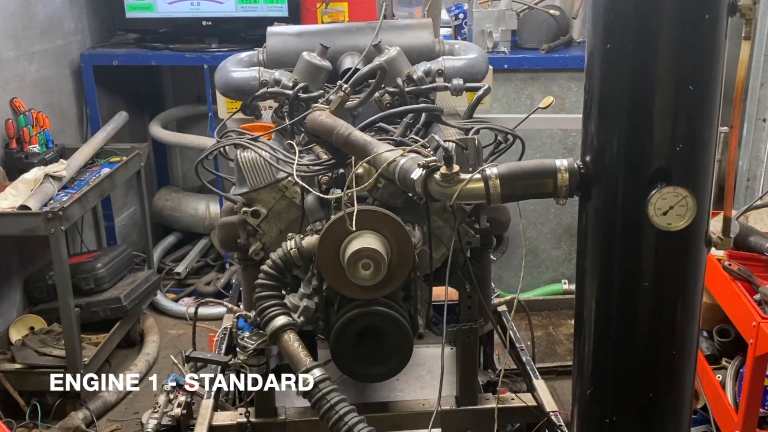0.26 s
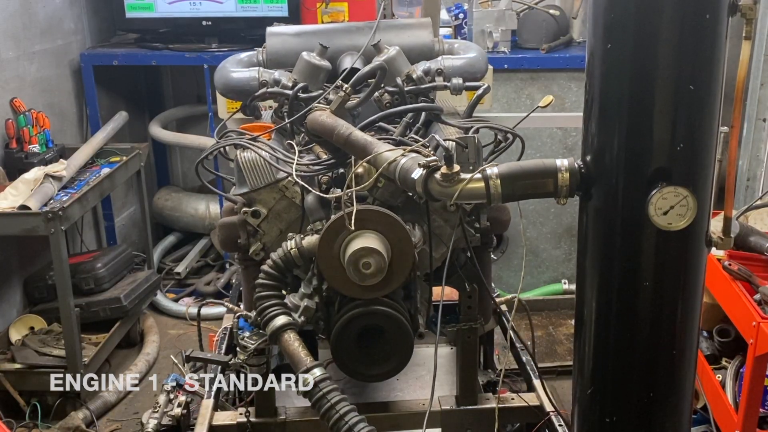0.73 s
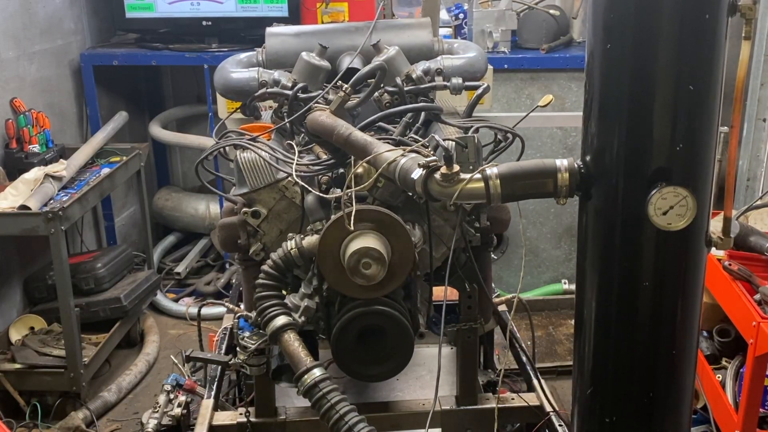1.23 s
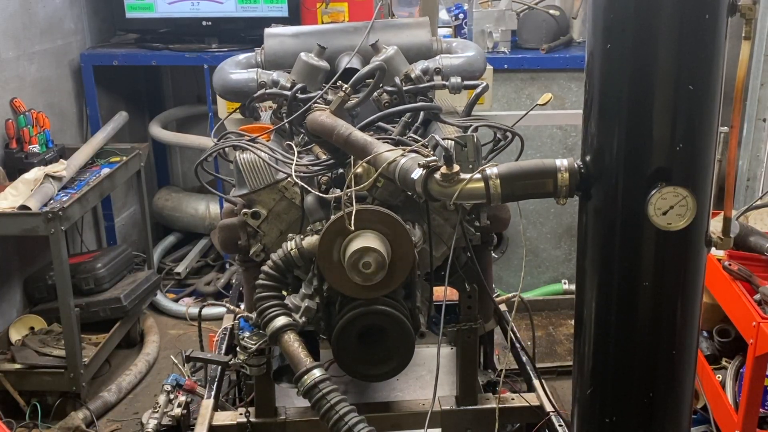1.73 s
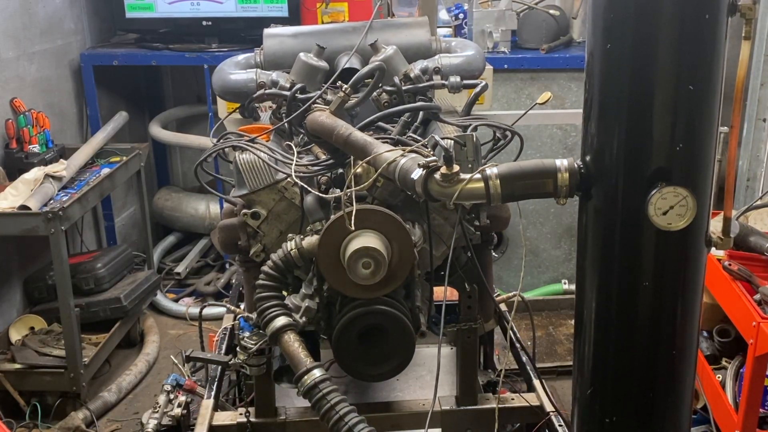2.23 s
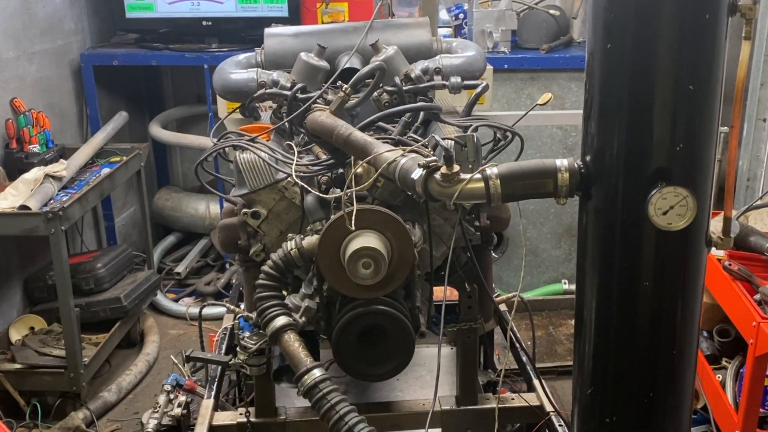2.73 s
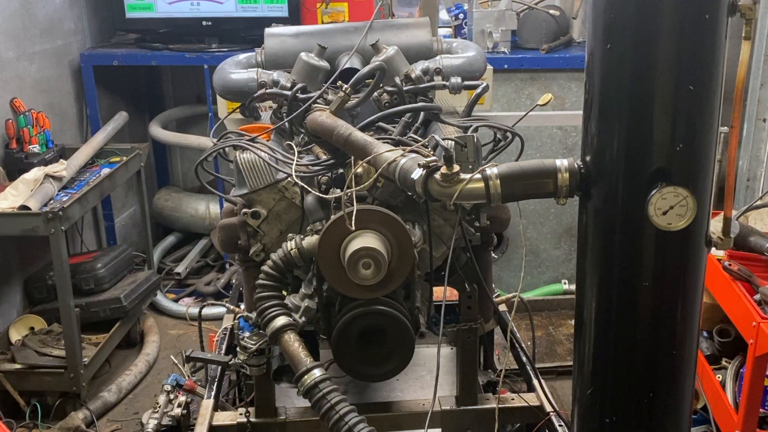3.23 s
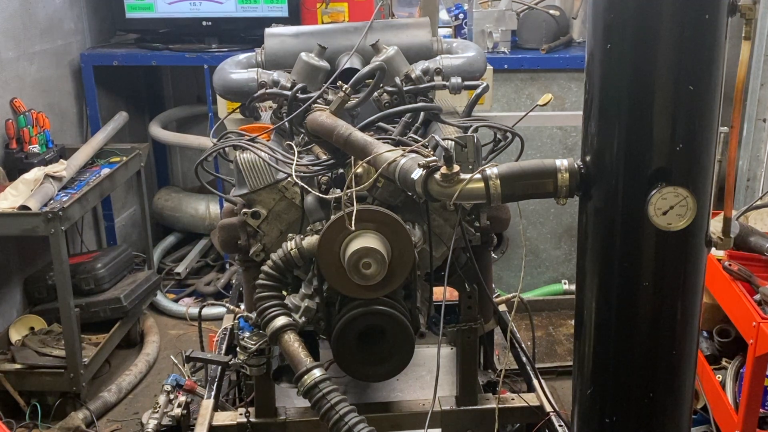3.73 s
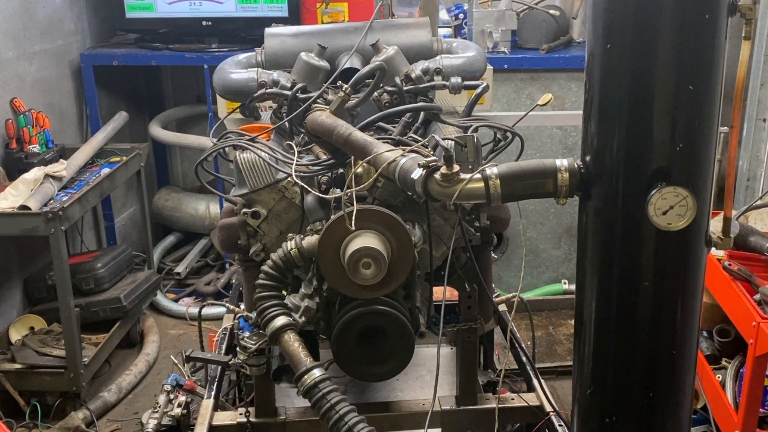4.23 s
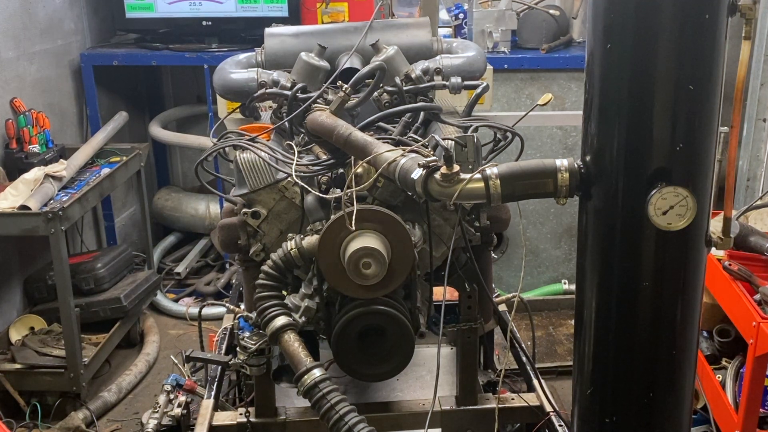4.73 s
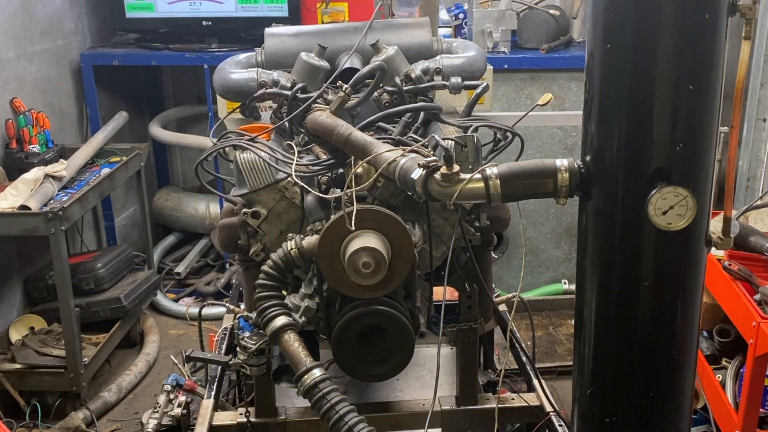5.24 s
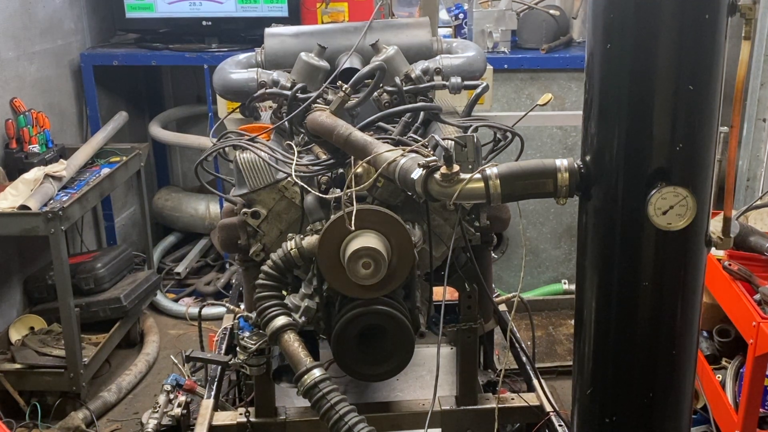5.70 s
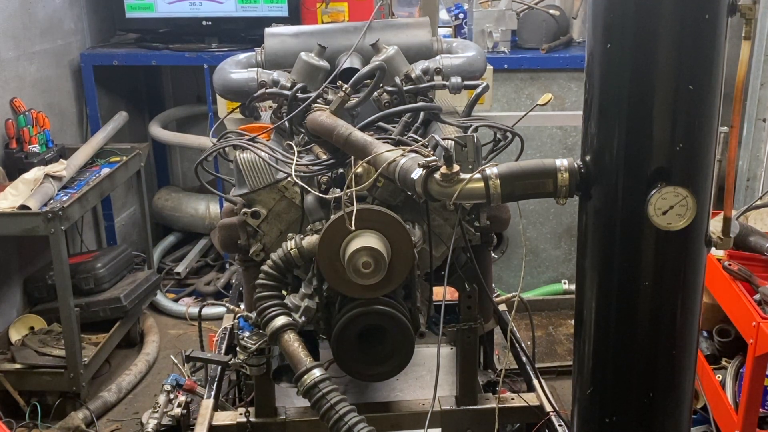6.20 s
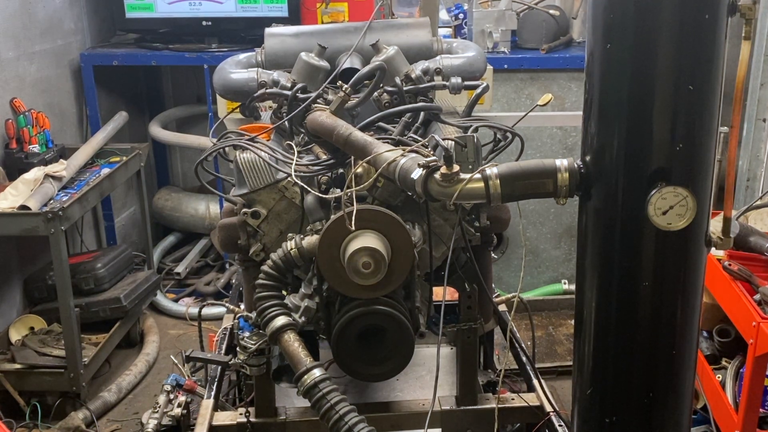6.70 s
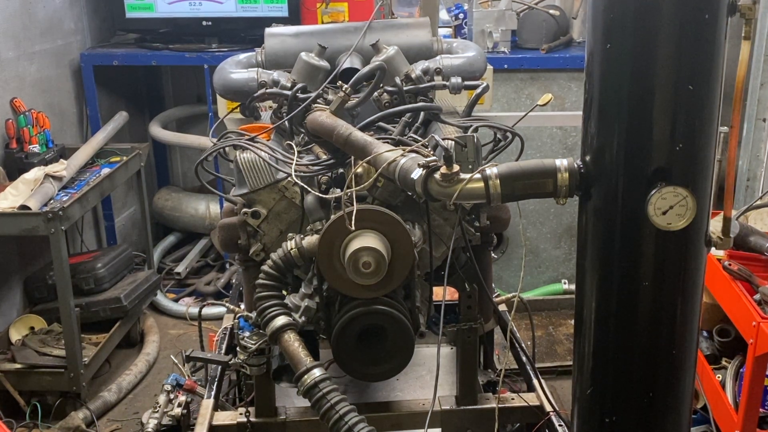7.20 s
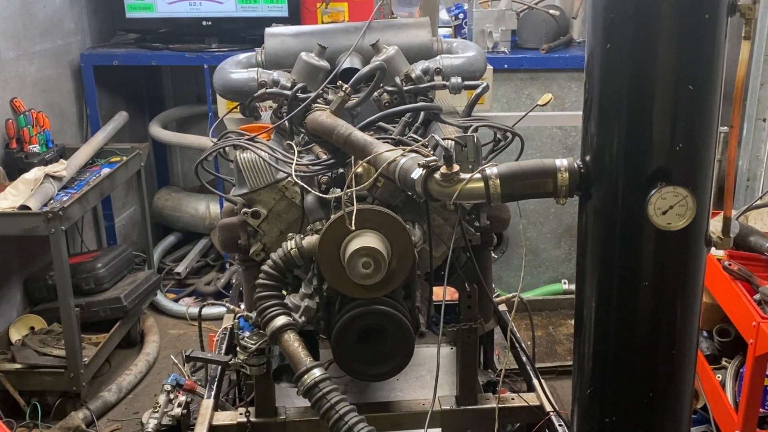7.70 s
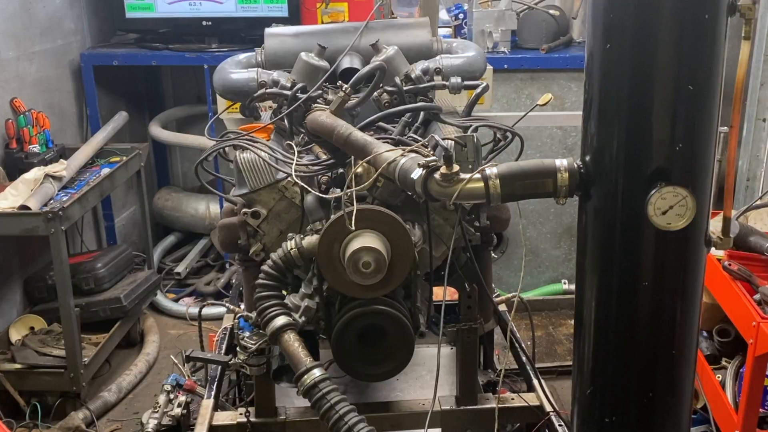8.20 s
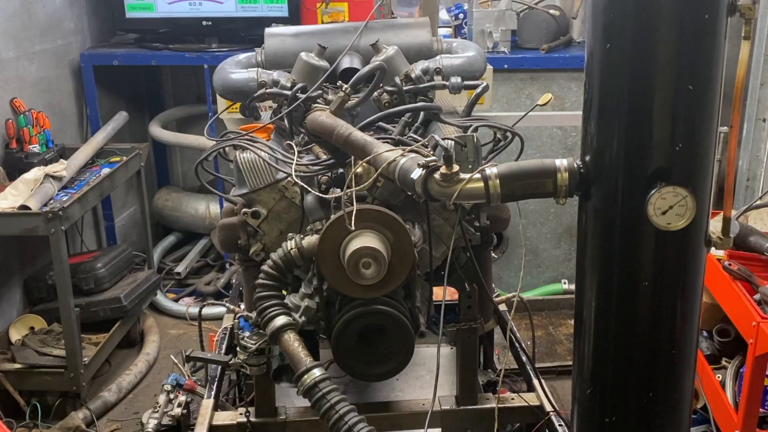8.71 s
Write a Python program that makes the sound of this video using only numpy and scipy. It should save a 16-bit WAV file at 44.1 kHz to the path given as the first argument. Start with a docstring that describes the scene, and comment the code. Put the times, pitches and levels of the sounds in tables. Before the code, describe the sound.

Close in a reverberant test cell, a V8 falls to a thumping, rattling idle, is pulled up under load, and holds a hard wavering growl.

```python
"""V8 on a test stand

A hard-walled cell, heard from a few metres on a phone with two microphone ports. The V8 drops to idle, is
pulled up to a fast speed and hunts about it. Clean sines carry the strong orders; an uneven cycle wave and
gas noise ring resonances as boom, growl, roar and rasp; noise beats with the crank as valve gear. Enveloped
noise makes ticks, rattle and crackle, short tones make thumps and barks, and an extractor hums behind.
"""
import sys
import numpy as np
from scipy import signal
from scipy.fft import rfft, irfft, next_fast_len
from scipy.io import wavfile
from scipy.ndimage import uniform_filter1d

SR = 44100
rng = np.random.default_rng(int(sys.argv[2]) if len(sys.argv) > 2 else 0)


def file_out(sig):
    """Save sig as 16-bit WAV at sys.argv[1]."""
    # one column per channel
    cols = np.atleast_2d(sig).T
    # limit, then scale
    lim = np.clip(cols, -1, 1)
    pcm = np.round(lim * 32767).astype(np.int16)
    wavfile.write(sys.argv[1], SR, pcm)


N = 394694
FFT = next_fast_len(N)
T, HZ = np.arange(N) / SR, np.fft.rfftfreq(FFT, 1 / SR)

# Engine speed. Each row: time in seconds, firing rate in Hz (eight firings a cycle).
FIRING_RATE = [(0, 165), (0.08, 172), (0.15, 173), (0.25, 146), (0.38, 123), (0.56, 99), (0.82, 79.5),
               (0.98, 67.0), (1.15, 56.5), (1.35, 54.0), (1.68, 50.8), (1.92, 74.7), (2.2, 103.0),
               (2.37, 119.0), (2.55, 129.8), (2.8, 135.9), (3.2, 135.8), (4.0, 129.2), (4.5, 125.6),
               (5.0, 123.6), (5.4, 122.9), (5.8, 125.6), (6.05, 130.9), (6.2, 132.9), (6.4, 129.1),
               (6.7, 123.0), (7.0, 119.2), (7.29, 116.4), (7.5, 116.0), (7.8, 113.2), (8.07, 110.6),
               (8.95, 114.2)]
# Clean orders, as multiples of the cycle rate: firing family, lope tones (below 8), tones between.
TONES = (8, 16, 20, 24, 32, 40, 44, 48, 56, 64, 58, 84, 3, 4, 5, 6, 7, 9, 11, 17, 18, 19, 22, 27, 28)
# One row per clean order: light running in dB, under load in dB, drift as the brake slackens in dB per
# second, left minus right in dB. Standing waves and the curves below add to the levels.
TONE_DB = [(-14.5, -16.5, 0, -2), (-32, -32.5, -0.27, 3), (-65, -34, -2.5, -6.5), (-44, -37.5, 0.03, -2),
           (-63, -43, -1.14, -4), (-51.5, -56.5, 0.46, -1), (-65, -61.5, 0.4, 12), (-70, -48, -0.42, -2),
           (-77, -50, -1.24, 3), (-71, -54.5, -0.04, 4), (-72, -60, 0.3, 4), (-84, -59.5, 1.5, 2),
           (-26, -27, 1.2, -5), (-16, -34.5, 1.3, -6), (-38, -16.5, -1.8, -2), (-19, -33, 0.5, 2),
           (-31, -25, -1.5, -3), (-45, -35, -0.5, -10), (-50, -40, -0.36, -2), (-48, -32.5, -0.5, 0),
           (-46, -29, -2, -1), (-47, -31, -1.5, -1), (-51, -38, 0.23, -1), (-57, -38, 0.26, -1),
           (-55, -38, -0.1, -1)]
# Firing strength as the throttle shuts, comes in bursts, catches the fall and pulls hard.
# Each row: time in seconds, gain of the firing family in dB.
FIRING_GAIN = [(0.05, -0.5), (0.18, -0.5), (0.25, 5), (0.31, -14), (0.38, -3.5), (0.46, -2), (0.54, -13),
               (0.62, -14), (0.72, -11), (0.83, -8), (0.92, -17), (1.02, -16), (1.1, -9), (1.2, -2.5),
               (1.75, 2), (1.9, 0.5), (2.1, 2), (2.3, 4.5), (2.5, 3.5), (2.65, 4)]
# Standing waves of pipes and cell. Each row: centre in Hz, nominal width in Hz, strength in dB;
# one table for the firing family, one for the lope tones, one for the tones between.
FIRING_STANDING = [(54, 16, 0.5), (81.3, 22.6, 4), (114, 50, -5.5), (177, 14, -33), (205.8, 17.2, 5),
                   (271.6, 13.5, 8), (348.8, 15, 5), (381.3, 38.5, 10.5), (437, 23, 10), (523.4, 35, 9.5),
                   (616.7, 22.5, 9.5), (648, 20, 6.5), (693.5, 26, 13), (745, 17, 10), (826, 12, 12),
                   (892, 83, 10.5), (985, 15, 14), (1178, 53, 11.5)]
LOPE_STANDING = [(57, 11, -7.5), (69, 5.8, -5), (82.6, 22.3, -0.5), (107.2, 3.8, -6.5)]
BETWEEN_STANDING = [(137, 68, 0), (171, 9.9, -0.7), (266, 25, 0.58), (309.6, 25, 0), (375, 18, -2),
                    (435, 31, 0)]
# Where reflections cancel while the brake pulls hardest. Each row: centre in Hz, width in Hz.
NULLS = [(64, 1), (134.8, 7.3), (410, 28)]

# Strength of the other orders by remainder after dividing by eight cylinders, relative dB:
# below the 40th order, and from the 40th up.
LOPE_DB = (9, 4, 0.5, 1, 2, 1.5, 1, -2.5)
HIGH_LOPE_DB = (5.5, 0, 0, 0, 5, -2, 1.5, 1.5)
# How hard the engine works. Each row: time in seconds, then rumble, roar, rasp and valve gear in dB,
# each before the fixed trim of its layer.
LOAD = [(0.0, -11, -14.5, -37, -29), (0.07, -37, -25.5, -25.5, -32.5), (0.15, -24, -28.5, -33, -38),
        (0.35, -18.5, -31, -40.5, -38.5), (0.65, -23, -35.5, -48, -42), (0.74, -25, -36, -46, -49),
        (0.97, -21.5, -38, -49, -55), (1.3, -23.5, -38.5, -45, -52), (1.6, -28, -37.5, -43.5, -50.5),
        (1.9, -20, -33.5, -46, -35), (2.3, -20.5, -29, -38.5, -36), (2.6, -16, -27, -35, -36.5),
        (3.4, -20.5, -25.5, -28.5, -36), (4.2, -20.5, -23.5, -28, -34), (5.5, -28, -27.5, -24.5, -33),
        (6.2, -23, -25.5, -27, -33), (6.7, -27, -27, -24.5, -32.5), (7.6, -20, -27.5, -28.5, -35),
        (8.3, -29, -27.5, -28.5, -34.5), (8.95, -21, -26.5, -30.5, -35.5)]
# How unevenly the charges burn. Each row: time in seconds, gas noise in dB before each layer's share.
GAS_NOISE = [(0, -1), (0.3, -2), (0.6, 0), (1.2, -13), (2.2, -1), (4.3, -2), (6.2, -1), (7, 0.5), (8.95, 0)]
# Resonances of exhaust and cell. Each row: centre in Hz, nominal width in Hz, relative strength in dB.
BOOM_MODES = [(54.4, 20, 1.5), (86.5, 4.2, -1), (115.6, 4.9, -1.5), (146, 19.3, -8.5)]
GROWL_MODES = [(156, 13, -7), (174, 10, -1), (220, 12, -5), (254.5, 15, 8), (273, 31, 3), (309, 36, 4),
               (346, 57, -3), (374, 21, 2.5), (458, 17, 0)]
ROAR_MODES = [(492, 360, 1.5), (616, 120, -1), (715, 85, 2.5), (780, 99, -0.5), (889, 108, 3.5),
              (940, 51, -10)]
RASP_MODES = [(1010, 54, -0.5), (1188, 85, 4), (1240, 40, -5)]
UPPER_RASP_MODES = [(1327, 27, -1.5), (1377, 22, 4), (1420, 20, 0.5), (1500, 89, -3), (1626, 77, -11)]
# Upper rasp against the lower. Each row: time in seconds, level in dB.
UPPER_RASP_DB = [(0, 2.5), (0.5, 2), (1.1, -7), (1.8, -1), (2.5, 2), (4.5, -0.5), (5.3, -1), (5.95, -2),
                 (6.3, 2), (6.7, 1.5), (7.3, 3), (7.7, 1.5), (8.05, 4.5), (8.5, 2.5), (8.95, 4)]
# Block resonances, sharp while the revs build, then blurred once it runs steadily.
# Each row: centre in Hz, nominal width in Hz, relative strength in dB.
BLOCK_MODES = [(1994, 42, -2.5), (2268, 49, 2.5), (2506, 16, 0.5), (3072, 39, 0), (2310, 1160, -5)]
BLURRED_BLOCK_MODES = [(1990, 85, -2), (2176, 55, 1), (2293, 85, 0), (2470, 33, -8), (3080, 85, -4.5),
                       (2460, 1450, -5.5)]
# Colour of the valve gear. Each row: frequency in Hz, relative spectral density in dB.
VALVE_COLOUR = [(3000, -10), (3600, -2), (5000, 1), (5800, -0.5), (6700, 0.5), (8000, -2), (9000, -4),
                (10500, -0.5), (12000, -6), (14000, -6), (15700, -15.5)]
# Intake snarl while the throttle is wide. Each row: time in seconds, level in dB.
SNARL_DB = [(0, -46), (0.1, -38), (0.15, -79), (1.7, -70), (1.85, -50), (2.05, -47), (2.25, -43),
            (2.6, -64), (3, -70)]
# Its band. Each row: centre in Hz, nominal width in Hz, relative strength in dB.
SNARL_MODES = [(4100, 380, 0), (4450, 510, 0), (2550, 250, -8)]

# Hard burns that bark. Each row: start in seconds, peak in dB, pitch in Hz.
BARKS = [(2.9066, -27, 1280), (2.969, -21, 1310), (3.0577, -21, 1420), (3.2703, -25, 1430),
         (3.388, -26, 1320), (3.4773, -29, 1500), (3.9412, -23, 1372), (4.1797, -20, 1420),
         (4.4587, -25, 1190), (4.8297, -21, 1360), (4.9105, -24, 1420), (4.969, -20.5, 1400),
         (5.0682, -22, 1220), (5.1689, -17.5, 1360), (5.3121, -21, 1370), (5.363, -16, 1380),
         (5.4289, -18, 1380), (5.4942, -19, 1390), (5.5526, -20, 1480), (5.6104, -21, 1175),
         (5.6738, -20, 1190), (5.7496, -22, 1304), (5.8143, -17, 1190), (5.8753, -16, 1320),
         (6.2455, -23, 1190), (6.3667, -21, 1420)]
# Uneven burns that thump in the pipes as the revs fall.
# Each row: middle in seconds, peak in dB, pitch in Hz, length in seconds.
THUMPS = [(0.15, -14, 74, 0.06), (0.235, -13, 56, 0.11), (0.46, -16, 55, 0.06), (0.54, -11.5, 80.4, 0.11),
          (0.72, -14, 56.3, 0.08), (0.79, -20, 79, 0.07), (0.86, -15.5, 62, 0.06), (1.19, -15, 56, 0.08),
          (0.09, -30, 262, 0.12), (0.24, -27, 291, 0.088), (0.62, -30.5, 292, 0.08),
          (0.78, -30, 255, 0.099), (1.11, -32, 254, 0.1)]
# Bright valve ticks near idle, about one a crank turn.
# Each row: start in seconds, level in dB before the swell and fall.
TICKS = [(0.7194, -39), (0.7994, -31), (0.8759, -31), (1.042, -33), (1.1054, -31), (1.1777, -33),
         (1.2501, -31), (1.3229, -33), (1.3982, -34), (1.4794, -36), (1.5554, -34), (1.6566, -32),
         (1.725, -27), (1.7794, -26), (1.8537, -22)]
# A loose part at idle. Each row: start in seconds, level in dB before the swell and fall.
RATTLES = [(1.0111, -31), (1.0475, -36), (1.1074, -28), (1.1378, -27), (1.2096, -31), (1.3364, -29),
           (1.4127, -36), (1.5274, -29), (1.5698, -31), (1.719, -28), (1.7809, -32), (1.8861, -23),
           (1.9639, -27)]
# Its resonances. Each row: centre in Hz, nominal width in Hz, relative strength in dB.
RATTLE_MODES = [(1150, 60, -2), (1190, 60, -4), (890, 83, -2)]
# Extractor fan and mains lines. Each row: frequency in Hz, level in dB before a slight waver.
HUM = [(150.7, -41.5), (517, -46), (775, -46), (845, -50.5)]

# The two microphone ports. Each row: frequency in Hz, then likeness (held to 0-1),
# lead of the left in radians, or left minus right in dB.
PORT_LIKENESS = [(60, 1), (130, 0.5), (290, 0.85), (600, 0), (1400, 0.68), (3100, 0.64), (5500, 0.37),
                 (7000, 0.67), (9000, 3.55), (15000, 1.3)]
PORT_LEAD = [(0, 0), (1120, .5), (2070, 0), (3100, .8), (3880, .3), (7050, 0), (9150, -3.14),
             (11250, -6.28), (13450, -9.42), (15500, -12.57)]
PORT_PAN = [(60, 1), (110, 1.5), (200, 5.5), (380, -4.5), (700, -0.5), (1290, 0.5), (2380, 0), (4400, 3),
            (8120, 0), (15000, 0)]

IDLE_ROAR_DB, FULL_ROAR_DB = -38, -26  # the roar curve tells how hard the engine works
BRAKE_SLACKENS_S = 1.95  # from here the pull on the brake slowly slackens
# idle dB and loaded dB before the layer's trim, slackening in dB per second
GROWL_DB, BLOCK_DB = (-46, -27.5, -1.6), (-41.5, -29, -0.69)
LIFT_S, LIFT_DB = (0.14, 0.22), 3  # the lope tones are strongest as the throttle shuts
NULLS_FILL_S = 4.8, 4.95
# with the last surge of speed the high tones come clear, five times the firing rate most
CLEAR_S, CLEAR_DB, FIFTH_CLEAR_DB = (6, 6.1), 8, 6
WHINE_S, WHINE_DB = (7.7, 9.2), 9  # the highest tone, held down by this, rises out of the rasp
SMOOTH_S, SMOOTH_DB = (6, 7.2), -14  # low gas noise dies down as the running evens out
DEAD_HZ, DEAD_WIDTH_HZ, DEAD_S = 199, 23, (4.7, 7)  # a dead spot opens as the brake slackens
STEADY_S, STEADY_DB = (6, 6.8), -5  # the rasp loses gas noise and rings on the orders
BLUR_S = 3.4, 4.8  # the block rings broaden between these times
BARK_S = 0.018
CRACKLE_PER_S, CRACKLE_FADE_S, CRACKLE_DB = 180, 0.15, -30  # level before each pop's own size
TOP_HZ = 15750


def tones(turn, levels_db):
    """The strong orders are clean sines locked to the cycle, each wavering slightly in level."""
    total = 0
    for k, db, (*_, pan) in zip(TONES, levels_db, TONE_DB):
        waver_db = (0.5 + 0.01 * k) * walk(8)
        sides_db = np.array([[pan], [-pan]]) / 2
        sine = np.sin(2 * np.pi * (k * turn + rng.random()))
        total = total + np.sqrt(2) * undb(db + waver_db + sides_db) * sine
    return total


def tone_levels(cycle_hz, load):
    """Each tone has its strength for the load and swells as it crosses a standing wave."""
    t, cycle_hz, load = T[::64], cycle_hz[::64], load[::64]  # levels move slowly
    pulled = np.clip(t - BRAKE_SLACKENS_S, 0, None)
    null_depth = np.interp(t, NULLS_FILL_S, (1, 0))
    clear = np.interp(t, CLEAR_S, (0, 1))
    levels_db = []
    for k, (light_db, loaded_db, drift, _) in zip(TONES, TONE_DB):
        hz = k * cycle_hz
        db = light_db + load * (loaded_db - light_db) + drift * pulled
        if k < 8:  # lope tones
            db = db + standing(hz, LOPE_STANDING) + LIFT_DB * np.interp(t, LIFT_S, (1, 0))
        elif k % 8 and k < 30 and k != 20:  # tones between
            db = db + standing(hz, BETWEEN_STANDING)
        else:  # firing family
            db = db + standing(hz, FIRING_STANDING) + np.interp(t, *np.transpose(FIRING_GAIN))
            db = db + ((k >= 40) * CLEAR_DB + (k == 40) * FIFTH_CLEAR_DB) * clear
            db = db + (k == 84) * WHINE_DB * np.interp(t, WHINE_S, (-1, 0))
            for null_hz, width in NULLS:
                cut_db = 10 * np.log10(1 + width ** 2 / ((hz - null_hz) ** 2 + 0.22))
                db = db - null_depth * cut_db
        levels_db.append(np.interp(T, t, db))
    return levels_db


def standing(hz, modes):
    """Level in dB of a tone among standing waves whose powers add."""
    power = sum(undb(2 * db) / (1 + (2 * (hz - centre) / width) ** 2) ** 1.595
                for centre, width, db in modes)
    return 10 * np.log10(power)


def engine(turn, rumble_db, growl_db, roar_db, rasp_db, block_db, valve_db):
    """Cycle orders and gas noise ring pipes and block; the valve gear beats once a crank turn."""
    wave = cycle(turn + 0.0013 * walk(12))  # the crank surges a little, blurring the high orders most
    orders = cell(wave, t60=0.38, wet=0.81)
    low_orders = cell(wave, t60=0.31, wet=0.78)  # long waves scatter less
    gas = undb(curves(GAS_NOISE)[0])
    beat = np.exp(-(2 * turn % 1) / .25)  # decays through each crank turn
    gas_sound = exhaust_lows(orders, low_orders, gas, rumble_db, growl_db) + roar(orders, gas, roar_db)
    metal_sound = block(beat, block_db) + valves_and_snarl(beat, valve_db)
    small_sounds = ticks() + intake_hiss() + rattle() + crackle()
    return gas_sound + rasp(orders, beat, rasp_db) + metal_sound + small_sounds


def cycle(turn, count=300):
    """The pressure wave repeating every two crank turns; two versions, one for each path in the cell."""
    k = np.arange(count)
    db = np.where(k < 40, np.take(LOPE_DB, k % 8), np.take(HIGH_LOPE_DB, k % 8))
    size = undb(db) * ~np.isin(k, TONES + (0, 1, 2))  # leave the clean orders to tones()
    phases = np.exp(2j * np.pi * rng.random((2, count)))
    shapes = irfft(size * phases, 4096)
    place = np.arange(4096) / 4096
    return unit(np.array([np.interp(turn % 1, place, shape, period=1) for shape in shapes]))


def cell(x, t60, wet):
    """Dense reflections make each order swell and fade as the speed moves it; t60 in seconds."""
    t = np.arange(SR // 2) / SR
    tail = rng.standard_normal((2, len(t))) * np.exp(-np.log(1000) * t / t60)
    tail *= wet / np.sqrt(np.sum(tail ** 2, axis=1, keepdims=True))
    return unit(x + signal.fftconvolve(x, tail, axes=1)[:, :N])


def exhaust_lows(orders, low_orders, gas, rumble_db, growl_db):
    """Orders and gas noise ring the boom and growl of exhaust and cell, with a dead spot opening."""
    lumps_db = 1.0 * walk(5.2)  # uneven burns make the low gas noise come in lumps
    low_gas = 1.2 * gas * noise() * undb(lumps_db + np.interp(T, SMOOTH_S, (0, SMOOTH_DB)))
    boom = ring(low_orders + low_gas, BOOM_MODES) * undb(rumble_db - 5.0)
    growl = ring(orders + 1.22 * gas * noise(), GROWL_MODES) * undb(growl_db - 1.0)
    lows = boom + growl
    dead_band = signal.lfilter(*signal.iirpeak(DEAD_HZ, DEAD_HZ / DEAD_WIDTH_HZ, SR), lows)
    return lows - np.interp(T, DEAD_S, (0, 1)) * dead_band


def roar(orders, gas, roar_db):
    """Orders and a larger share of gas noise ring the middle resonances, unsteady in level."""
    return ring(orders + 1.9 * gas * noise(), ROAR_MODES) * undb(roar_db - 0.5 + 1.3 * walk(8))


def rasp(orders, beat, rasp_db):
    """Orders and noise, beating with the crank, ring two bands that flicker separately."""
    gas = 2.4 * noise() * undb(np.interp(T, STEADY_S, (0, STEADY_DB)))
    grit = (orders + gas) * (1 + 0.59 * beat)
    lower = ring(grit, RASP_MODES) * undb(0.8 * walk(11))
    upper = ring(grit, UPPER_RASP_MODES) * undb(curves(UPPER_RASP_DB)[0] + 1.0 * walk(7))
    return (lower + upper) * undb(rasp_db - 3.0)


def block(beat, block_db):
    """Noise with a faint crank beat rings the block, whose sharp resonances give way to broad ones."""
    knock = noise() * (1 + 0.048 * beat)
    blur = np.interp(T, BLUR_S, (0, 1))
    rings = (1 - blur) * ring(knock, BLOCK_MODES) + blur * ring(knock, BLURRED_BLOCK_MODES)
    return rings * undb(block_db + 2.5 + 0.4 * walk(8))


def valves_and_snarl(beat, valve_db):
    """One flickering noise, beating with the crank, is coloured as valve gear and as intake snarl."""
    flicker_db = 0.62 * walk(7.6) + 0.36 * walk(22) + 0.44 * walk(40)
    sizzle = noise() * (1 + 0.33 * beat) * undb(flicker_db)
    colour = undb(over_hz(VALVE_COLOUR)) * (HZ > 2800)
    valves = unit(irfft(rfft(sizzle, FFT) * colour, FFT)[:, :N]) * undb(valve_db + 3.5)
    snarl = ring(sizzle, SNARL_MODES) * undb(curves(SNARL_DB)[0])
    return valves + snarl


def barks():
    """Each hard burn is a short rounded tone at a rasp pitch."""
    return swells([(s + BARK_S / 2, db, hz, BARK_S) for s, db, hz in BARKS])


def thumps():
    """Each uneven burn is a rounded tone at a pipe pitch."""
    return swells(THUMPS)


def ticks():
    """Soft-edged bursts of bright noise for the valves."""
    bright = signal.butter(1, (4500, 12000), "band", fs=SR, output="sos")
    return bursts(TICKS, rise=0.0051, fall=0.014) * unit(signal.sosfilt(bright, noise()))


def intake_hiss():
    """Higher noise that runs throughout with a slight waver."""
    band = signal.butter(1, (8000, 14000), "band", fs=SR, output="sos")
    return undb(-45.5 + 1.5 * walk(8.6)) * unit(signal.sosfilt(band, noise()))


def rattle():
    """Short runs of knocks: enveloped noise coloured by the loose part's resonances."""
    return ring(noise(), RATTLE_MODES) * bursts(RATTLES, rise=0.0067, fall=0.027)


def crackle():
    """The exhaust spits as the throttle shuts: scattered pops of very different size, fading out."""
    pops = (rng.random(N) < CRACKLE_PER_S / SR) * undb(2.0 * rng.exponential(size=N))
    puff = signal.lfilter([1], [1, -np.exp(-1 / (0.0012 * SR))], pops)  # each dies away over 1.2 ms
    puff = puff * np.exp(-T / CRACKLE_FADE_S)
    band = signal.butter(1, (900, 6000), "band", fs=SR, output="sos")
    return undb(CRACKLE_DB) * puff * unit(signal.sosfilt(band, noise()))


def extractor():
    """Steady fan and mains lines that waver slightly."""
    return sum(np.sqrt(2) * undb(db + 1.6 * walk(7.9)) * np.sin(2 * np.pi * (hz * T + rng.random()))
               for hz, db in HUM)


def ports(paths):
    """One path reaches both ports, with a lag that changes over frequency; the other tells them apart."""
    a, b = rfft(paths, FFT)
    alike = np.clip(over_hz(PORT_LIKENESS), 0, 1)
    same = np.sqrt((1 + alike) / 2) * a
    apart = np.sqrt((1 - alike) / 2) * b
    # half the lead and half the level difference go to each side
    half = np.exp(.5j * np.interp(HZ, *np.transpose(PORT_LEAD))) * undb(over_hz(PORT_PAN) / 2)
    return irfft(np.array([(same + apart) * half, (same - apart) / half]), FFT)[:, :N]


def undb(db):
    """Decibels to amplitude."""
    return 10 ** (np.asarray(db) / 20)


def unit(x):
    """Sound scaled to an RMS of one."""
    return x / np.sqrt(np.mean(x ** 2))


def noise():
    """White noise, one for each path."""
    return rng.standard_normal((2, N))


def walk(rate):
    """Random levels drawn every 1 / rate seconds and smoothed twice; spread near 1."""
    k = int(SR / rate)
    steps = np.repeat(rng.standard_normal(N // k + 1), k)
    return 1.3 * uniform_filter1d(uniform_filter1d(steps, k), k)[:N]


def curves(table):
    """Every column after the time, read at each sample."""
    s, *columns = np.transpose(table)
    return [np.interp(T, s, column) for column in columns]


def over_hz(table):
    """A table of frequency and value read at every frequency, on a near-log scale."""
    hz, value = np.transpose(table)
    return np.interp(np.log(HZ + 20), np.log(hz + 20), value)


def ring(x, modes):
    """Sound through a set of resonances whose powers add, scaled to an RMS of one."""
    power = 0
    for hz, width, db in modes:
        detune = (HZ ** 2 - hz ** 2) / (width * HZ + 1e-9)
        power = power + undb(2 * db) / (1 + detune ** 2) ** 1.332
    return unit(irfft(rfft(x, FFT) * np.sqrt(power), FFT)[:, :N])


def bursts(events, rise, fall):
    """An envelope with a quick swell and a fall for each event; rise and fall in seconds."""
    t = T[::16]
    envelope = 0
    for s, db in events:
        after = np.clip(t - s, 0, None)
        envelope = envelope + undb(db) * (1 - np.exp(-after / rise)) * np.exp(-after / fall)
    return np.interp(T, t, envelope)


def swells(events):
    """A short rounded tone for each event of middle, peak in dB, pitch and length."""
    out, phases = np.zeros(N), rng.random(len(events))
    for (s, db, hz, length), phase in zip(events, phases):
        near = slice(int((s - 2 * length) * SR), int((s + 2 * length) * SR))
        t = T[near] - s
        out[near] += undb(db) * np.exp(-(2 * t / length) ** 2) * np.sin(2 * np.pi * (hz * t + phase))
    return out


def scene():
    """Speed and load drive the engine; its noise and orders reach the ports, the hum lies behind."""
    cycle_hz = curves(FIRING_RATE)[0] / 8
    turn = np.cumsum(cycle_hz) / SR  # engine cycles so far, two crank turns each
    rumble_db, roar_db, rasp_db, valve_db = curves(LOAD)
    load = np.clip((roar_db - IDLE_ROAR_DB) / (FULL_ROAR_DB - IDLE_ROAR_DB), 0, 1)
    pulled = np.clip(T - BRAKE_SLACKENS_S, 0, None)

    def follow(idle_db, loaded_db, per_s):
        """Level that follows the load and drifts as the brake slackens."""
        return idle_db + load * (loaded_db - idle_db) + per_s * pulled

    body = engine(turn, rumble_db, follow(*GROWL_DB), roar_db, rasp_db, follow(*BLOCK_DB), valve_db)
    strong_orders = tones(turn, tone_levels(cycle_hz, load))
    return strong_orders + ports(body) + barks() + thumps() + extractor()


def record(dry):
    """The phone drops the deepest bass and cuts the top."""
    low_cut = signal.butter(4, 38, "high", fs=SR, output="sos")
    top_cut = signal.ellip(10, .2, 80, TOP_HZ, fs=SR, output="sos")
    return signal.sosfilt(top_cut, signal.sosfilt(low_cut, dry))


dry = scene()
out = record(dry)
file_out(out)
```